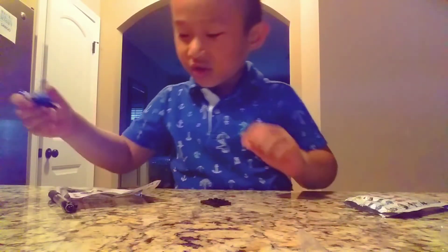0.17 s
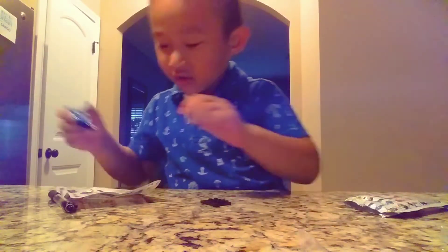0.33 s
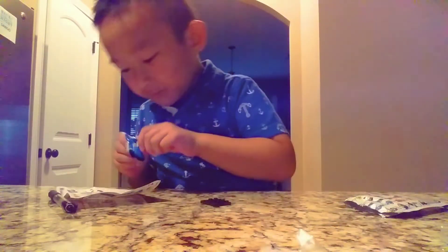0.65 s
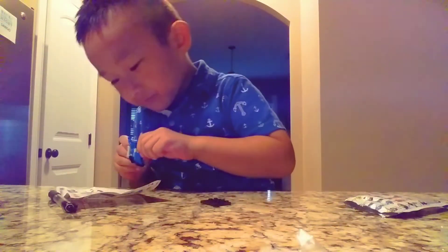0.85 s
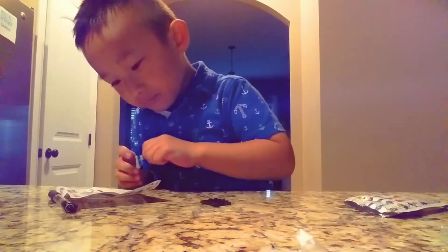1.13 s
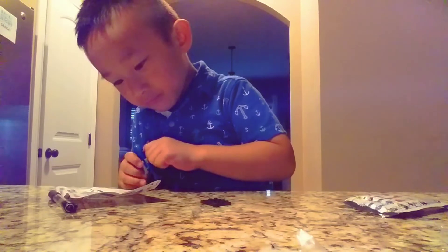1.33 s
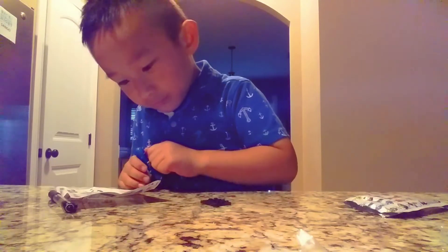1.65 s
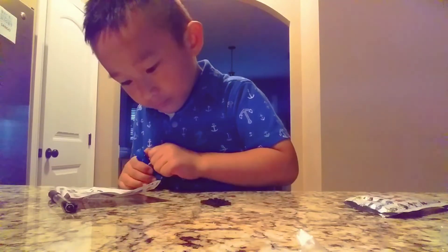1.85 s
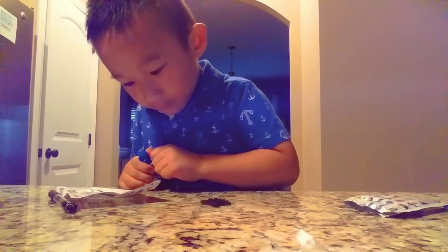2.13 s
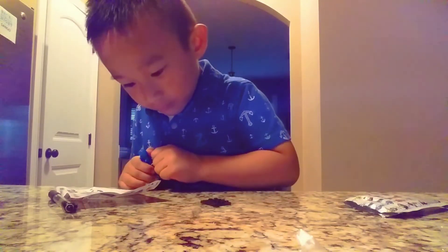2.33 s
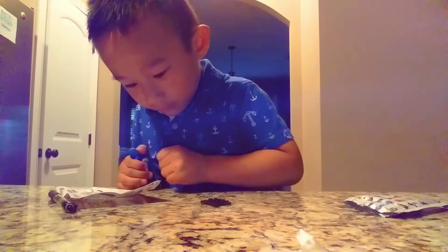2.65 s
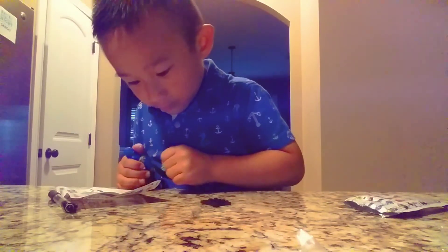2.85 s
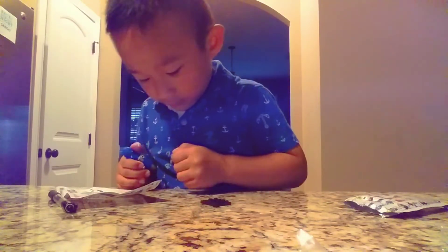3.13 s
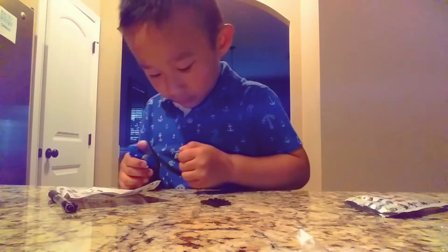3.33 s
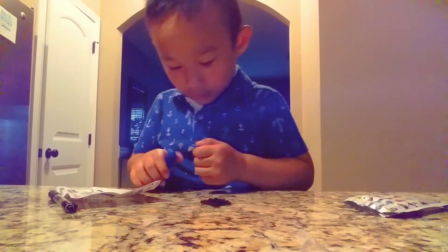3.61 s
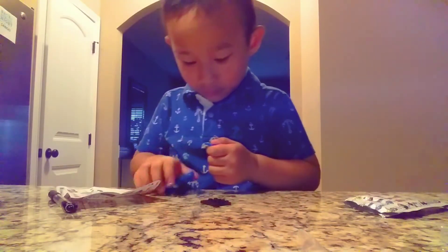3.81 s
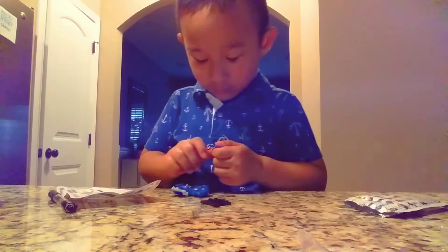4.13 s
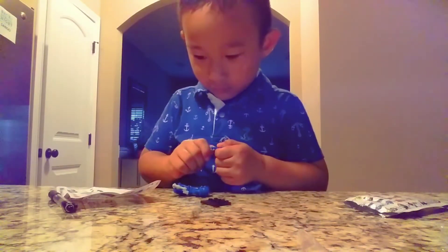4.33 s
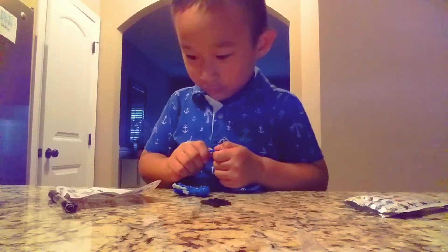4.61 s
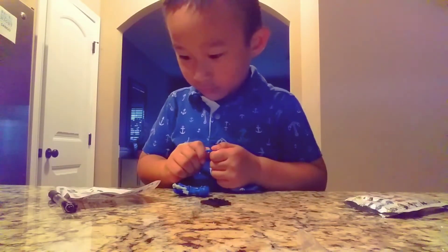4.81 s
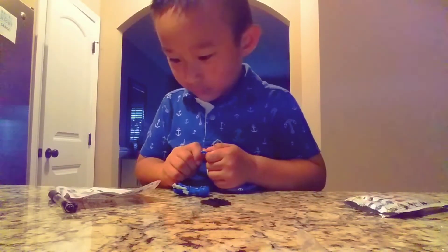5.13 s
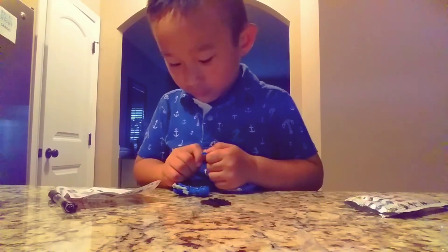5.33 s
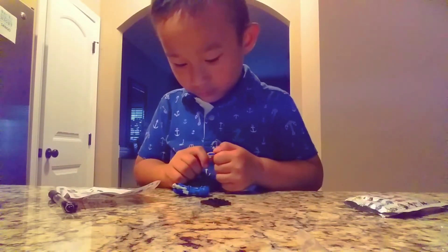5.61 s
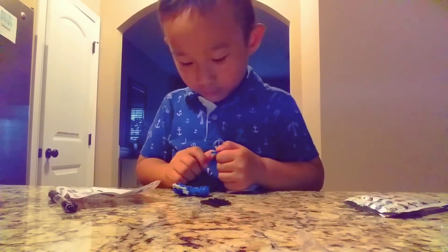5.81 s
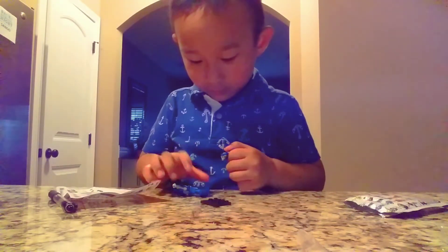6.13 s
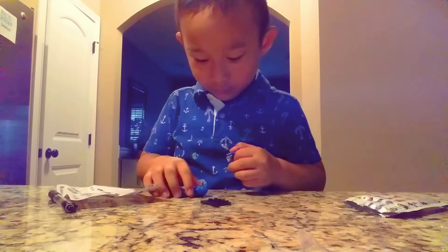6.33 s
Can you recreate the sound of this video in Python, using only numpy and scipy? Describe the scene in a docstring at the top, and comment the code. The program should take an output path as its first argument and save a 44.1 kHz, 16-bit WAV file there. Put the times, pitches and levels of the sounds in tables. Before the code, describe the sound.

A quiet kitchen with hard walls and a faint, steady low hum. For the first second or so only soft finger rustle and a light plastic scrape at 0.4 s are heard. Around 1.4 to 1.5 s three brief gritty slips come close together. At 2.0 s a hollow plastic model clacks hard on the stone counter, and a second, brighter double clack at 2.2 s is the loudest; both ring briefly into the room. Rustling follows, with small knocks and a snap from 2.7 to 2.95 s and faint snaps near 3.1 s. A crisp tap comes at 3.63 s, then at 3.83 s the model is put down and rocks in quick, weakening bright ticks with a short slide. A stud snaps at 4.4 s. After a sparse pause, a scrape and small knocks come from 5.2 to 5.8 s, and a tap at 6.17 s leads into three clearer scraping slides from 6.3 s to the end.

```python
"""Fingers rustle on small plastic bricks; a hollow model knocks on a stone kitchen counter and slides over it.
Studs snap, and the model, once let go, rocks from corner to corner; a low hum lies under it all.
Touches are pushes or trains of slips that ring the counter, the hollow model, its thin walls and a contact crack.
Rustle is random grains, the hum is shaped noise plus a sine; a hard-walled kitchen answers every contact."""
import sys
import numpy as np
from scipy import signal
from scipy.fft import rfft, irfft, next_fast_len
from scipy.io import wavfile

SR = 44100
rng = np.random.default_rng(int(sys.argv[2]) if len(sys.argv) > 2 else 0)


def dump(signal):
    """Clip the signal to [-1, 1] and save it as 16-bit WAV at the path in sys.argv[1]."""
    limited = np.clip(np.atleast_2d(signal).T, -1, 1)
    pcm = np.round(limited * 32767).astype(np.int16)
    wavfile.write(sys.argv[1], SR, pcm)


N = 284886
TOP_HZ = 15700  # band limit
SPAN = 32768  # samples per touch and per room response
HZ = np.fft.rfftfreq(SPAN, 1 / SR)
T = np.arange(SPAN) / SR

# Levels are set before the left-right lean; thud, walls and crack are relative to the hollow ring. Model bumps
# the counter or another brick; hands shade or uncover its straight path to the microphones. The 2.017 s row is
# the strong first echo of the 2.009 s knock off a nearby surface: time_s, ring_level_db, ring_hz,
# hardness_db_per_octave, thud_db, straight_path_db
KNOCKS = [ (0.25, -66.5, 816, 4, 9, 8), (1.169, -47.5, 690, 1.5, -10, -4), (1.975, -47, 654, -6, -4, -5),
          (2.009, -17, 600, -3, -12.5, 1), (2.017, -16, 664, -23, -16, 6.5),
          (2.088, -27.5, 820, -4.5, -15, 4), (2.203, -11.5, 927, -2, -17, -1.5),
          (2.210, -12.5, 641, -6.5, -19.5, 5.5), (2.698, -44, 1170, 1.5, -11, -2),
          (2.845, -36.5, 680, 1, -4.5, -3), (2.941, -32, 530, -2, -6.5, -5),
          (3.63, -26.5, 844, 2, -4.5, -6), (3.636, -26.5, 1390, 3.3, -15, -5.5),
          (3.826, -27.5, 1500, 3, -20, 6), (3.831, -28.5, 1486, 2.5, -20, 6.5),
          (5.163, -32.5, 1205, -0.5, -14, -15), (5.258, -38, 445, 6, -1, -12.5),
          (5.509, -35, 1120, 0.5, -9, -0.5), (5.796, -32.5, 706, -0.5, -13.5, -6.5),
          (6.166, -33, 1483, 0.6, -14, -1.5)]
# Plastic slides on stone or plastic:
# peak_s, rise_s, ring_level_db, ring_hz, hardness_db_per_octave, thud_db
SLIDES = [ (.440, 0.019, -37.5, 756, 1.2, -7.5), (1.205, 0.015, -45, 690, -0.5, -6),
          (1.412, .024, -33, 520, -3, -16), (1.466, 0.021, -30.5, 500, 0.3, -14),
          (1.497, 0.019, -35, 795, 1, -31), (3.092, 0.013, -45, 490, 1, 5.5),
          (3.872, 0.031, -36.5, 870, 4, -3), (4.383, 0.0029, -50.5, 1450, 0.5, -10),
          (4.932, .011, -47.5, 1400, -2, -8), (5.242, .012, -27, 1075, 2.5, -12),
          (6.125, .013, -41, 1255, -4.5, -10), (6.331, .017, -24, 863, -2, -23),
          (6.357, 0.013, -26, 1216, 0, -14), (6.443, .02, -29.5, 644, -1.5, -12)]
# Studs snap in or out; the 2.844 s row is the wall-heavy crack of a knock whose soft thump is among the knocks:
# time_s, ring_level_db, hardness_db_per_octave, straight_path_db
SNAPS = [(.128, -67.5, 2.5, 5), (1.973, -69.5, 6, -2), (2.844, -38, -4, -1), (3.119, -37.5, 2.5, 4),
         (3.176, -53, 4, -2), (4.387, -32.5, -1, -4), (4.698, -54.5, 1, 3.5)]
# Fingers and sleeves brush the bricks: start_s, length_s, level_db
BRUSHES = [(0, 0.06, -48.5), (0.468, 0.27, -48.5), (0.857, .11, -48.5), (1.05, 0.29, -52),
           (1.93, 0.11, -63.5), (2.396, 0.37, -49), (3.224, 0.079, -51), (3.984, 0.3, -52.5),
           (5.566, 1, -56.5), (6.18, 0.11, -45)]

# Tone of each kind of touch at hardness 0: walls_db, crack_db, crack_slope_db_per_octave
KNOCK_TONE = (-12, -18, -1)
SLIDE_TONE = (-8.5, -12.5, -.5)
SNAP_TONE = (3, 1, -5.5)
ROCK_TONE = (-4, 7, .5)

# Stone counter modes: mode_hz, width_hz, level_db
COUNTER = [(90.6, 17, -5), (160, 280, 0.5), (228, 7.7, -10), (280, 230, 2.5), (430, 640, 4)]
# Hollow model modes: mode_hz, width_hz, level_db
HOLLOW = [(466, 61, 2), (657, 124, 3), (807, 57, 4.5), (908, 67, 2), (1065, 59, 4.5), (1221, 186, 1.5),
          (1526, 440, 2.5)]
# Thin wall modes: mode_hz, width_hz, level_db
WALLS = [(1926, 525, 4), (2980, 924, 3.5), (3335, 625, 4.5), (4086, 340, -2)]
# Contact crack spectrum: freq_hz, level_db_per_hz
CRACK = [(1500, -16.5), (3200, -7.5), (4600, 0), (6500, -0.5), (8000, 1.5), (9200, -6.5), (12000, -0.5),
         (16000, -6)]
# Rustle spectrum: freq_hz, level_db_per_hz
RUSTLE = [(200, -20), (500, -2), (850, 0.5), (1250, -5), (1750, -6.5), (2120, 0), (2500, -7), (4000, -9.5),
          (5500, -17), (8000, -14.5), (9500, -22), (15500, -18.5)]
# Nearest reflecting surfaces: delay_s, left_gain, right_gain
MIRRORS = [(.0027, 0.36, 0.4), (.0067, 0.22, 0.2), (.0088, .4, 0.35)]
# Kitchen tail decay: freq_hz, t60_s
KITCHEN = [(100, 0.89), (500, 0.52), (1200, 0.92), (3500, 0.77), (7000, 0.68), (14000, 0.41)]
# Left-right correlation of diffuse sound: freq_hz, likeness
ALIKE = [(60, 0.91), (125, 0.97), (250, 0.86), (500, 0.53), (1000, 0), (15000, 0)]
# House hum spectrum: freq_hz, level_db_per_hz
HUM = [(25, -45), (40, -44), (62, 0), (95, -4.5), (135, -2), (300, -8.5), (500, -14), (800, -16.5),
       (1200, -19.5), (2000, -46), (4000, -58), (8000, -37.5), (15500, -42.5)]

WALL_OCTAVES, CRACK_OCTAVES = 1.57, 3.02  # how far walls and crack lie above the hollow ring
EDGE_SHARE = 0.92  # share of the hardness that also brightens the crack
STUD_RING_HZ = 1493  # hollow mode that studs and corners drive
ROCK_START_S, ROCK_FLIGHT_S, ROCK_SHRINK = 3.824, 0.04, 0.88  # each flight is shorter than the last
ROCK_DB, ROCK_LOSS_DB = -45, 2.5  # first landing, loss per further landing
TRAIL_S, TRAIL_DB, TRAIL_LOSS_DB = 0.007, -43, 10.5  # second corner lands just after, soon stays down
BRUSH_ATTACK_S, BRUSH_RELEASE_S = 0.052, 0.1  # time constants


def knocks(crack, tilt_db_per_octave=-1.05):
    """Each knock is one sharp push on the hollow model."""
    track = np.zeros((2, N))
    for time_s, level_db, ring_hz, hardness, thud_db, straight_db in KNOCKS:
        sound = touch([1], level_db, ring_hz, hardness, thud_db, KNOCK_TONE,
                      straight_db, tilt_db_per_octave, crack)
        add(track, time_s, sound)
    return track


def slides(crack, slips_per_s=2000, scatter_db=5.5, straight_db=2, fall_share=0.78,
           tilt_db_per_octave=-0.5):
    """Sliding plastic sticks and slips: a swelling train of tiny uneven pushes."""
    track = np.zeros((2, N))
    for peak_s, rise_s, level_db, ring_hz, hardness, thud_db in SLIDES:
        from_peak_s = T - 2 * rise_s
        width_s = np.where(from_peak_s < 0, rise_s, fall_share * rise_s)
        stroke = np.exp(-(from_peak_s / width_s) ** 2)
        slip_now = rng.random(SPAN) < slips_per_s / SR
        direction = rng.choice([-1, 1], SPAN)
        slips = slip_now * direction * amp(scatter_db * rng.standard_normal(SPAN))
        sound = touch(stroke * slips, level_db, ring_hz, hardness, thud_db, SLIDE_TONE,
                      straight_db, tilt_db_per_octave, crack)
        add(track, peak_s - 2 * rise_s, sound)
    return track


def snaps(crack, tilt_db_per_octave=9, thud_db=-23):
    """Studs snap between the fingers: mostly walls and crack, hardly any thud."""
    track = np.zeros((2, N))
    for time_s, level_db, hardness, straight_db in SNAPS:
        sound = touch([1], level_db, STUD_RING_HZ, hardness, thud_db, SNAP_TONE,
                      straight_db, tilt_db_per_octave, crack)
        add(track, time_s, sound)
    return track


def rocking(crack, straight_db=14, tilt_db_per_octave=1.5, thud_db=-12):
    """Let go, the model ticks from corner to corner, faster and weaker, with no hand to shade it."""
    track = np.zeros((2, N))
    landing_s = ROCK_START_S
    for k in range(4):
        landing_s += ROCK_FLIGHT_S * ROCK_SHRINK ** k
        first = (0, ROCK_DB - ROCK_LOSS_DB * k)
        second = (TRAIL_S, TRAIL_DB - TRAIL_LOSS_DB * k)
        for late_s, level_db in (first, second):
            sound = touch([1], level_db, STUD_RING_HZ, 0, thud_db, ROCK_TONE,
                          straight_db, tilt_db_per_octave, crack)
            add(track, landing_s + late_s, sound)
    return track


def touch(force, level_db, ring_hz, hardness, thud_db, tone, straight_db, tilt_db_per_octave, crack):
    """The harder the touch, the more walls and crack stand out over the hollow ring."""
    wall_db, crack_db, slope = tone
    wall_db = wall_db + WALL_OCTAVES * hardness
    crack_db = crack_db + CRACK_OCTAVES * hardness
    levels_db = level_db + np.array([thud_db, 0, wall_db, crack_db])
    crack_slope = slope + EDGE_SHARE * hardness
    return bricks(force, straight_db, ring_hz, tilt_db_per_octave, crack_slope, levels_db, crack)


def bricks(force, straight_db, ring_hz, tilt_db_per_octave, crack_slope, levels_db, crack,
           focus_db=13, single_db=6, single_octaves=0.037):
    """A force sounds counter, hollow model, thin walls and contact; levels are rms over 50 ms."""
    heard = rfft(force, SPAN) * kitchen(straight_db)

    def tilt(hz):
        return tilt_db_per_octave * np.log2(hz)

    def place(hz):
        # the struck spot singles out one hollow mode and drives its neighbours less
        away = np.log2(hz / ring_hz) ** 2
        return single_db * np.exp(-away / single_octaves ** 2) - focus_db * away

    octaves_up = np.log2(np.maximum(HZ / WALLS[-1][0], 1))
    edge = amp(crack_slope * octaves_up)  # a sharp edge cracks brighter
    parts = ring(COUNTER, tilt), ring(HOLLOW, place), ring(WALLS, tilt), crack * edge
    sound = sum(amp(db) * unit(irfft(heard * part)) for db, part in zip(levels_db, parts))
    fade = np.minimum(10 * (T[-1] - T), 1)
    return sound * np.sqrt(SR / 20 / SPAN) * fade


def ring(modes, favour):
    """Response of damped modes with alternating signs, each driven by favour(Hz) dB."""
    low_hz, high_hz = modes[0][0], modes[-1][0]
    body = 0
    for k, (hz, width_hz, level_db) in enumerate(modes):
        damping = 1j * HZ * width_hz
        body = body + (-1) ** k * amp(level_db + favour(hz)) * damping / (hz ** 2 - HZ ** 2 + damping)
    # little is radiated below the lowest mode or above the highest
    return body * (1j * HZ / (low_hz + 1j * HZ)) ** 2 / (1 + 1j * HZ / high_hz)


def handling(grains_per_s=350, scatter_db=5):
    """Skin and cloth brush the bricks in faint grains; each stroke swells, holds and dies away."""
    grain_now = rng.random(N) < grains_per_s / SR
    grains = grain_now * amp(scatter_db * rng.standard_normal(N))
    brush = irfft(kitchen() * causal(RUSTLE))
    rustle = unit(signal.fftconvolve(grains[None], brush, axes=1)[:, :N])
    t = np.arange(N) / SR
    strokes = []
    for start_s, length_s, level_db in BRUSHES:
        swell = np.minimum(t - start_s, 0) / BRUSH_ATTACK_S
        decay = np.maximum(t - start_s - length_s, 0) / BRUSH_RELEASE_S
        strokes.append(amp(level_db) * np.exp(swell - decay))
    return rustle * np.max(strokes, axis=0)


def kitchen(straight_db=0, left_lag_s=0.0002, left_share=0.33, wander_s=0.00028,
            early_db=-22, early_t60_s=0.13, tail_db=-30, build_s=0.0041):
    """Hands-to-microphones response: sharp first paths, scatter off the counter, a long tail."""
    hz, t, z = signal.stft(diffuse(SPAN), SR, nperseg=256)
    decay = amp(-60 * t / along(KITCHEN, hz)[:, None])
    tail = signal.istft(z * decay, SR, nperseg=256)[1][:, :SPAN]
    scatter = diffuse(SPAN) * amp(early_db - 60 * T / early_t60_s)
    room = (scatter + amp(tail_db) * tail) * (1 - np.exp(-T / build_s))
    # the straight path reaches the right microphone first
    room[0, round(left_lag_s * SR)] += amp(straight_db) * left_share
    room[1, 0] += amp(straight_db)
    for delay_s, *gains in MIRRORS:  # these paths shift as the hands move
        arrival_s = np.abs(delay_s + wander_s * rng.standard_normal(2))
        room[np.arange(2), (arrival_s * SR).astype(int)] += gains
    return rfft(room)


def house(hum_db=-52.0, motor_hz=88, motor_db=-61):
    """Low air noise and the faint steady sine of a distant appliance; levels are rms."""
    hum = diffuse(next_fast_len(N), HUM)[:, :N]
    motor = np.sqrt(2) * np.sin(2 * np.pi * motor_hz * np.arange(N) / SR)
    return amp(hum_db) * hum + amp(motor_db) * motor


def diffuse(size, spectrum=((1, 0), (2, 0))):
    """Noise from all sides: alike at both microphones in the bass only."""
    hz = np.fft.rfftfreq(size, 1 / SR)
    turn = np.arccos(np.clip(along(ALIKE, hz), -1, 1)) / 2
    noise = rfft(rng.standard_normal((2, size))) * amp(along(spectrum, hz))
    mid, side = irfft(noise * [np.cos(turn), np.sin(turn)], size)
    return unit(np.array([mid + side, mid - side]))


def causal(points):
    """Minimum-phase response with this spectrum: it starts at once, then dies."""
    cepstrum = irfft(np.log(amp(along(points, HZ))))
    cepstrum[1:SPAN // 2] *= 2
    cepstrum[SPAN // 2 + 1:] = 0
    return np.exp(rfft(cepstrum))


def along(points, hz):
    """(Hz, value) points joined on a log-frequency axis."""
    f, v = np.transpose(points)
    return np.interp(np.log(hz + 1), np.log(f + 1), v)


def amp(db):
    """Decibels to gain."""
    return 10 ** (np.asarray(db) / 20)


def unit(x):
    """x scaled to rms 1."""
    return x / np.sqrt(np.mean(x ** 2) + 1e-20)


def add(track, time_s, sound):
    """Mix a sound into the track from time_s on."""
    start = max(round(time_s * SR), 0)
    part = track[:, start:start + SPAN]
    part += sound[:, :part.shape[1]]


def scene(lean_db=0.62, dispersion=1.2):
    """The hands work a little nearer to the right microphone, over the low hum of the house."""
    # bending waves in the thin plastic carry the highs first
    crack = causal(CRACK) * np.exp(-1j * dispersion * np.sqrt(HZ))
    play = knocks(crack) + slides(crack) + snaps(crack) + rocking(crack) + handling()
    return play * amp([[-lean_db], [lean_db]]) + house()


def record(dry):
    """Clip at full scale, then remove everything from the band limit up."""
    size = next_fast_len(N + SPAN)
    keep = np.fft.rfftfreq(size, 1 / SR) < TOP_HZ
    return irfft(rfft(np.clip(dry, -1, 1), size) * keep, size)[:, :N]


dry = scene()
out = record(dry)
dump(out)
```